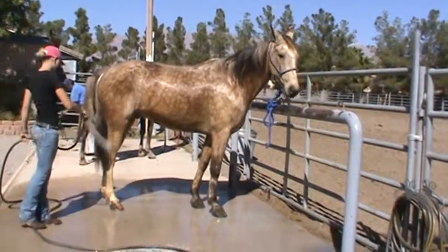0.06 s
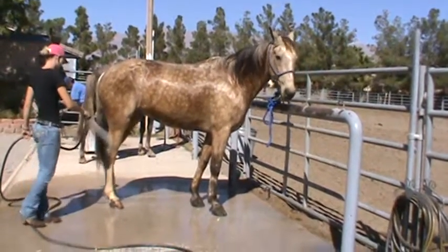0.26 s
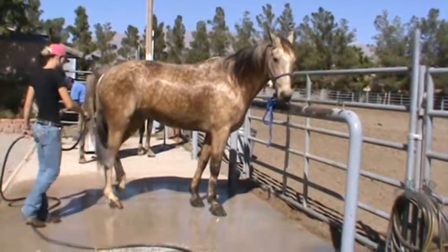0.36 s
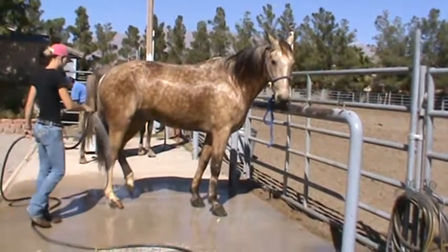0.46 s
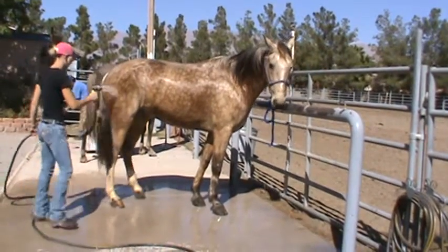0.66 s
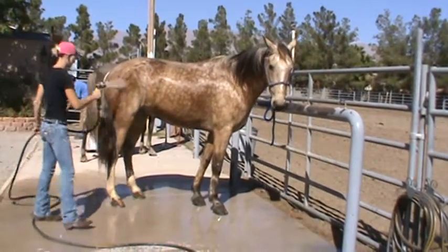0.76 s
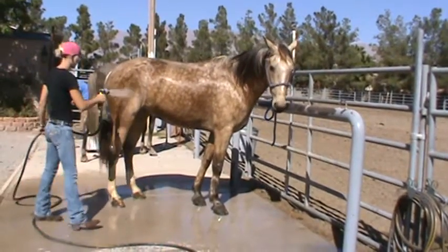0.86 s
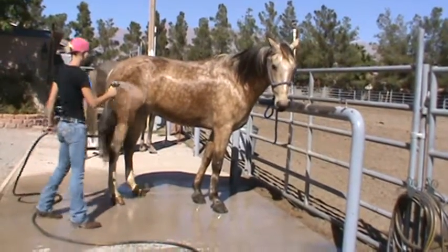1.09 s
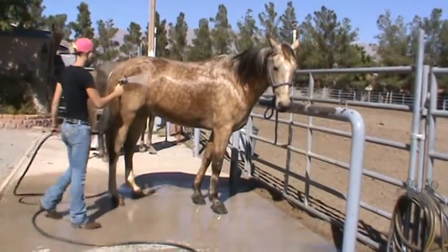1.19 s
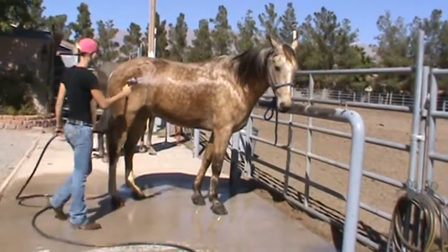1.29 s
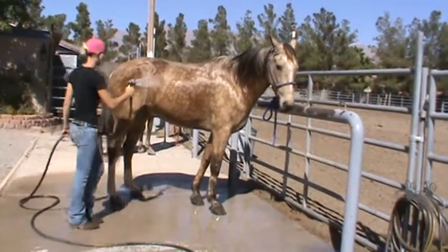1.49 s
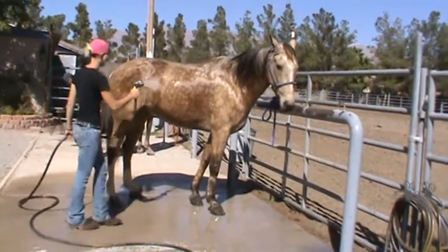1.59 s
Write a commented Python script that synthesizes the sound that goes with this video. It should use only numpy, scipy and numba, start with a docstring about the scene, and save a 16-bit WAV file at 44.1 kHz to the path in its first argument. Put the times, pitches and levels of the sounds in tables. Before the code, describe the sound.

Hose spray hisses steadily on a horse while a steel gate clanks twice.

```python
"""Hose spray hisses and patters on a horse; big drops smack the wet concrete pad over low yard rumble.
Hooves knock and scuff, with one low thump as the weight lands.
A steel gate clanks twice: its modes ring, the frame shudders, loose parts rebound and rattle.
Later the latch clacks shut. A fast limiter flattens the clanks and ducks the spray under them."""
import sys
import numpy as np
from scipy import signal
from scipy.fft import rfft, irfft, next_fast_len
from scipy.io import wavfile
from scipy.ndimage import uniform_filter1d, minimum_filter1d
from numba import njit

SR = 44100
rng = np.random.default_rng(int(sys.argv[2]) if len(sys.argv) > 2 else 0)


def generate_wav(sig):
    """Save sig (samples, or channels by samples) to the path in sys.argv[1] as 16-bit PCM at SR."""
    pcm = np.round(np.clip(np.atleast_2d(sig).T, -1, 1) * 32767).astype(np.int16)
    wavfile.write(sys.argv[1], SR, pcm)


N = 72765
T = np.arange(N) / SR

# mist and droplets (frequency [Hz], relative level [dB])
SPRAY_SPECTRUM = [(400, -49), (1500, -10), (2700, -6), (4300, -6.5), (4900, 0), (7200, 2.5), (7700, 6),
                  (9400, 2), (11500, -9), (13000, -31), (16000, -28)]
# spray as the jet moves (time [s], level [dB])
SPRAY_LEVELS = [(0, -38.5), (.05, -39), (.09, -33.5), (.18, -38), (.5, -41), (.62, -41), (.8, -37),
                (.97, -39.5), (1.1, -38), (1.2, -41.5), (1.27, -45.5), (1.35, -44.5), (1.42, -37.5),
                (1.56, -40), (1.65, -37)]
# water on the coat (frequency [Hz], relative level [dB])
COAT_SPECTRUM = [(1000, -23.5), (2500, -18.5), (4000, -10.5), (5500, -17.5), (9000, -30.5)]
# water on the coat (time [s], level [dB])
COAT_LEVELS = [(0, -51.5), (.4, -43.5), (.65, -46), (.9, -41), (1.17, -48), (1.27, -58), (1.5, -40),
               (1.65, -64)]
# outdoor rumble (frequency [Hz], relative level [dB])
YARD_SPECTRUM = [(15, -51), (25, -22.5), (86, -0.5), (154, -9.5), (193, -10.5), (260, -12), (344, -14),
                 (456, -18.5), (702, -15.5), (1400, -20.5), (2200, -28), (2860, -44), (4840, -120)]
# big drops on concrete (time [s], level [dB], centre [Hz])
DROP_HITS = [(.008, -26.5, 6500), (0.0451, -30, 6200), (0.073, -28, 7200), (0.1158, -18, 6530),
             (0.118, -27, 6700), (0.2026, -18, 4300), (0.2036, -20, 6450), (0.489, -22, 6700),
             (0.539, -21.5, 6240), (.6895, -28, 8150), (.951, -16.5, 6450), (0.9724, -29, 8000),
             (.984, -24.5, 9000), (1.0495, -24, 5100), (1.1163, -24.5, 5820), (1.165, -32, 8800),
             (1.2059, -25.5, 4540), (1.3032, -25, 6350), (1.324, -22.5, 8500), (1.336, -28.5, 7600),
             (1.4431, -23, 6500), (1.5198, -24, 8200), (1.543, -22, 6900)]
# hoof contacts (time [s], level [dB], centre [Hz], t60 [s])
HOOF_HITS = [(0.213, -33, 388, 0.06), (0.6441, -18, 1300, 0.028), (.647, -28.5, 614, 0.014),
             (.662, -33, 990, 0.043), (.679, -34.5, 880, 0.049), (0.7, -28.5, 330, 0.087),
             (0.705, -28.5, 380, 0.036), (0.816, -35, 1150, 0.038), (0.869, -35, 160, 0.046),
             (0.893, -33.5, 840, 0.083), (0.93, -37.5, 890, 0.089)]
# gate clanks (time [s], clash level [dB], shudder level [dB])
GATE_CLANKS = [(0.225, -16, -28.5), (.7103, -17, -32)]
# steel modes (frequency [Hz])
GATE_MODES_HZ = [3017, 3122, 3577, 3714, 4080, 4483, 6283, 7085, 7527, 8105, 8536, 8599, 8764, 8786, 8843,
                 8884, 9233, 9808, 10432, 11475, 11826, 11886]
# steel modes (t60 [s])
GATE_MODES_T60_S = [0.31, 0.24, 0.47, 0.3, 0.19, 0.38, 0.3, 0.64, 1.203, 0.3, 0.4, 0.39, 0.35, 0.41, 0.43,
                    0.4, .35, .33, 0.97, 0.33, 0.34, 0.93]
# steel modes, a row per clank, a column per mode (level [dB])
GATE_MODES_DB = [
    [-30, -15.5, -24.5, -32, -17, -22, -31, -23, -14, -10.5, -23, -22, -18, -35.5, -42, -17, -22, -20, -52,
     -27, -25, -40.5],
    [-21, -44, -26.5, -17, -41, -25, -22, -26, -29, -12.5, -14.5, -10, -23, -25, -22, -21, -49, -26.5, -34,
     -32, -47, -34],
]
# steel clash (frequency [Hz], relative level [dB])
CLASH_SPECTRUM = [(400, -30), (700, -18), (1300, -16.5), (1550, -7), (2000, -12), (2600, -7), (3040, -1),
                  (3330, -7.5), (4400, 1), (5140, -12.5), (6400, 3), (7500, -5), (8650, -2), (10500, -10.5),
                  (11800, -16), (12600, -65.5)]
# dull frame shudder (frequency [Hz], relative level [dB])
SHUDDER_SPECTRUM = [(30, -15), (70, -13), (130, -1.5), (250, 1), (380, -1), (600, -13), (1500, -28.5)]
# rebounds of loose parts (time [s], level [dB])
RATTLE_HITS = [(.297, -19), (0.3167, -24), (0.3275, -33), (0.338, -37), (0.381, -38), (0.7259, -17.5),
               (0.744, -28), (.766, -25.5), (0.7913, -20.5), (0.801, -33.5), (0.813, -41)]
# buzz of loose parts (frequency [Hz], relative level [dB])
RATTLE_SPECTRUM = [(1200, -25), (2000, -11.5), (2300, -6.5), (2700, -19), (3080, 3.5), (3300, -3.5),
                   (3550, 5), (4000, -15.5), (5400, -12), (6150, 7), (6800, -12.5), (9000, -10),
                   (12000, -53)]
# modes of loose parts (frequency [Hz], t60 [s], relative level [dB])
RATTLE_MODES = [(3112, 0.13, -0.5), (3550, .1, -12), (6100, 0.076, -7)]
# light touches on the steel (time [s], level [dB])
STEEL_TOUCHES = [(.766, -44), (1.470, -36.5)]
# latch clacks (time [s], level [dB])
LATCH_HITS = [(1.373, -15), (1.3755, -26.5), (1.3877, -28), (1.4414, -23.5), (1.461, -30), (1.471, -22),
              (1.637, -34)]
# latch crack (frequency [Hz], relative level [dB])
LATCH_SPECTRUM = [(200, -10), (700, -20.5), (1000, -11.5), (1500, -28), (2000, -4), (2500, -4.5), (3000, 7),
                  (3800, 2.5), (4600, -12.5), (6500, -19), (12000, -39)]
# latch modes (frequency [Hz], t60 [s], relative level [dB])
LATCH_MODES = [(2400, .016, -3), (3047, .12, -17), (3258, .08, -19), (3738, .16, -19), (3773, .27, -20),
               (4060, .11, -26), (4965, .28, -21), (6304, .15, -30)]
# stereo difference (frequency [Hz], relative level [dB])
SIDE_SPECTRUM = [(30, -17), (120, -13), (250, -2.5), (500, 4), (1000, 3.5), (2000, -5.5), (4000, -2.5),
                 (8000, -1), (16000, 5.5)]
# microphone hiss (frequency [Hz], relative level [dB])
HISS_SPECTRUM = [(2000, -5), (8000, -8), (13000, 4), (16000, 0)]


def undb(db):
    return 10 ** (np.asarray(db) / 20)


def unit_rms(x):
    return x / np.sqrt(np.mean(x ** 2))


def colour(x, spectrum):
    """Minimum-phase filter through (Hz, dB) points; white noise keeps its level."""
    size = next_fast_len(2 * N)
    hz, db = np.array(sorted(spectrum)).T
    log_bins = np.log(np.fft.rfftfreq(size, 1 / SR) + 1)
    gain = unit_rms(undb(np.interp(log_bins, np.log(hz), db)))
    cepstrum = irfft(np.log(gain), size)
    cepstrum[1:size // 2] *= 2
    cepstrum[size // 2 + 1:] = 0
    return irfft(rfft(x, size) * np.exp(rfft(cepstrum)), size)[:N]


def butter(x, order, hz, kind):
    return signal.lfilter(*signal.butter(order, hz, kind, fs=SR), x)


def noise(spectrum):
    return colour(rng.standard_normal(N), spectrum)


def decay(start_s, t60_s):
    return (T >= start_s) * np.exp(-np.log(1000) * np.maximum(T - start_s, 0) / t60_s)


def ring(start_s, hz, t60_s):
    return decay(start_s, t60_s) * np.sin(2 * np.pi * hz * (T - start_s))


def strike(hits, modes):
    """Every hit rings every mode."""
    return sum(undb(db + mode_db) * ring(s, hz, t60) for s, db in hits for hz, t60, mode_db in modes)


def burst(start_s, hz, relative_width, t60_s):
    """Brief contact: noise through one broad resonance, with the energy of a unit decay."""
    envelope = decay(start_s, t60_s)
    edge_ratio = 1 + relative_width / 2
    x = butter(envelope * rng.standard_normal(N), 1, [hz / edge_ratio, hz * edge_ratio], "band")
    x = butter(x, 1, [hz / 2, hz * 2], "band")
    return x * np.sqrt(np.sum(envelope ** 2) / np.sum(x ** 2))


def wander(rate_hz):
    """Smooth random drift, unit RMS."""
    hold = int(SR / rate_hz)
    steps = np.repeat(rng.standard_normal(N // hold + 1), hold)
    return unit_rms(uniform_filter1d(steps, hold)[:N])


def gain_curve(levels):
    return undb(np.interp(T, *np.array(levels).T))


def reflect(x, t60_s):
    """Scattered reflections: a noise tail of unit energy."""
    tail = rng.standard_normal(N) * decay(0.00058, t60_s)
    return signal.fftconvolve(x, tail / np.sqrt(np.sum(tail ** 2)))[:N]


def spray(droplets_per_s=2500, spread_db=3.5, patter_db=0.5, flicker_db=1.66):
    """Mist hisses, droplets patter, the jet washes over the coat; the level flickers."""
    sizes = undb(spread_db * np.minimum(rng.exponential(size=N), 5)) * rng.choice([-1, 1], N)
    patter = unit_rms((rng.random(N) < droplets_per_s / SR) * sizes)
    water = unit_rms(rng.standard_normal(N) + undb(patter_db) * patter)
    jet = colour(water, SPRAY_SPECTRUM) * gain_curve(SPRAY_LEVELS)
    coat = noise(COAT_SPECTRUM) * gain_curve(COAT_LEVELS)
    return (jet + coat) * undb(flicker_db * wander(rate_hz=44.92))


def yard(level_db=-46.5, swell_db=2.4):
    """Low, wavering outdoor rumble."""
    rumble = noise(YARD_SPECTRUM + [(5000, -56)])
    return undb(level_db) * rumble * undb(swell_db * wander(rate_hz=11.78))


def drops(scatter_db=-12):
    """Big drops smack the wet pad and scatter."""
    smacks = sum(undb(db) * burst(s, hz, relative_width=0.31, t60_s=0.0093) for s, db, hz in DROP_HITS)
    scatter = undb(scatter_db) * reflect(smacks, t60_s=0.065)
    return butter(smacks + scatter, 4, 11400, "low")


def hooves(thump_s=0.6478, thump_db=-13.5, attack_s=0.0016):
    """Hollow knocks and scuffs; the weight lands with one low thump."""
    knocks = sum(undb(db) * burst(s, hz, relative_width=0.5, t60_s=t60) for s, db, hz, t60 in HOOF_HITS)
    attack = np.clip((T - thump_s) / attack_s, 0, 1)
    thump = undb(thump_db) * ring(thump_s, hz=140, t60_s=0.042) * attack
    return butter(knocks, 2, 2410, "low") + butter(thump, 2, 85, "high")


def gate(chatter_per_s=300, chatter_tau_s=0.029, chatter_db=-27, crack_db=3):
    """Each clank cracks and rings the steel; quick chatter restrikes it and the frame shudders."""
    out = np.zeros(N)
    for (start_s, clash_db, shudder_db), modes_db in zip(GATE_CLANKS, GATE_MODES_DB):
        modes = zip(GATE_MODES_HZ, GATE_MODES_T60_S, modes_db)
        steel = sum(undb(db) * ring(0, hz, t60) for hz, t60, db in modes)
        chatter = (rng.random(N) < chatter_per_s / SR) * rng.standard_normal(N)
        blows = undb(chatter_db) * chatter * (T > start_s) * np.exp(-abs(T - start_s) / chatter_tau_s)
        blows[int(start_s * SR)] += 1  # main blow
        out += signal.fftconvolve(blows, steel)[:N]
        clash_envelope = decay(start_s, t60_s=0.43) + undb(crack_db) * decay(start_s, t60_s=0.059)
        out += undb(clash_db) * clash_envelope * noise(CLASH_SPECTRUM)
        out += undb(shudder_db) * decay(start_s, t60_s=0.47) * noise(SHUDDER_SPECTRUM)
    return out


def rattle():
    """Loose parts rebound after each clank with a buzz and a short ring."""
    envelope = sum(undb(db) * decay(s, t60_s=0.1) for s, db in RATTLE_HITS)
    buzz = colour(envelope * rng.standard_normal(N), RATTLE_SPECTRUM)
    return buzz + strike(RATTLE_HITS, RATTLE_MODES)


def steel_touches():
    """Light touches renew one thin, high steel mode."""
    return sum(undb(db) * ring(s, hz=7528, t60_s=0.65) for s, db in STEEL_TOUCHES)


def latch(tail_db=-9.5, snap_hz=2950, snap_t60_s=0.008, snap_db=-2):
    """The latch shuts: hard snap and crack, short noise tail, a few damped modes."""
    envelope = sum(undb(db) * (decay(s, t60_s=0.011) + undb(tail_db) * decay(s, t60_s=0.094))
                   for s, db in LATCH_HITS)
    crack = colour(envelope * rng.standard_normal(N), LATCH_SPECTRUM)
    rings = strike(LATCH_HITS, LATCH_MODES + [(snap_hz, snap_t60_s, snap_db)])
    return crack + butter(rings, 3, 1710, "high")


def scene(echo_db=-17, hiss_db=-55.5):
    """All sources centred; reflections and independent spray and rumble add width."""
    hits = gate() + rattle() + steel_touches() + latch() + hooves() + drops()
    mid = hits + undb(echo_db) * reflect(hits, t60_s=0.27) + spray() + yard()
    side = 0.34 * reflect(hits, t60_s=0.029) + 0.3 * spray() + 0.4 * yard()
    side = colour(side, SIDE_SPECTRUM)
    mic_hiss = undb(hiss_db) * np.array([noise(HISS_SPECTRUM), noise(HISS_SPECTRUM)])
    return np.array([mid + side, mid - side]) + mic_hiss


@njit
def follow_peak(x, fall_factor):
    """Instant rise, exponential fall."""
    out, peak = np.empty(len(x)), 0.
    for i in range(len(x)):
        peak = max(x[i], peak * fall_factor)
        out[i] = peak
    return out


def record(dry, ceiling=0.46, release_s=0.081, smooth_samples=33, top_hz=16000):
    """Fast stereo-linked limiter, then a steep low-pass."""
    peak = follow_peak(np.abs(dry).max(axis=0), np.exp(-1 / (release_s * SR)))
    gain = ceiling / np.maximum(peak, ceiling)
    gain = uniform_filter1d(minimum_filter1d(gain, smooth_samples), smooth_samples)
    return signal.sosfilt(signal.ellip(10, .2, 80, top_hz, fs=SR, output="sos"), dry * gain)


dry = scene()
out = record(dry)
generate_wav(out)
```